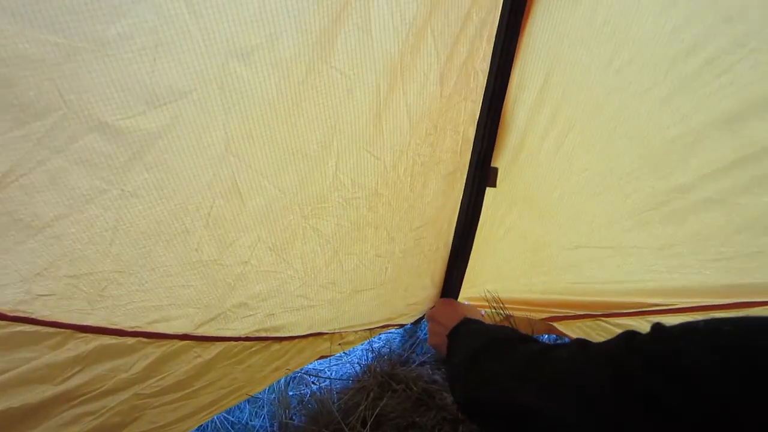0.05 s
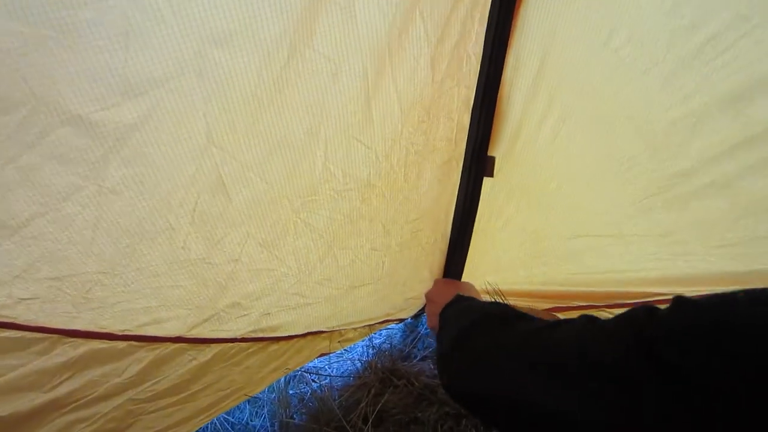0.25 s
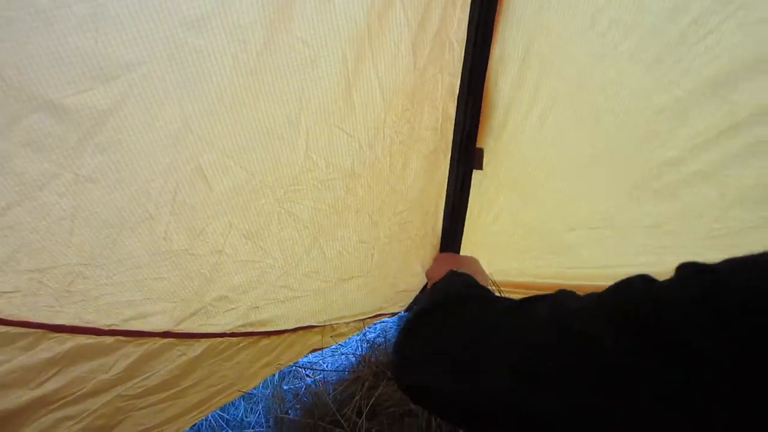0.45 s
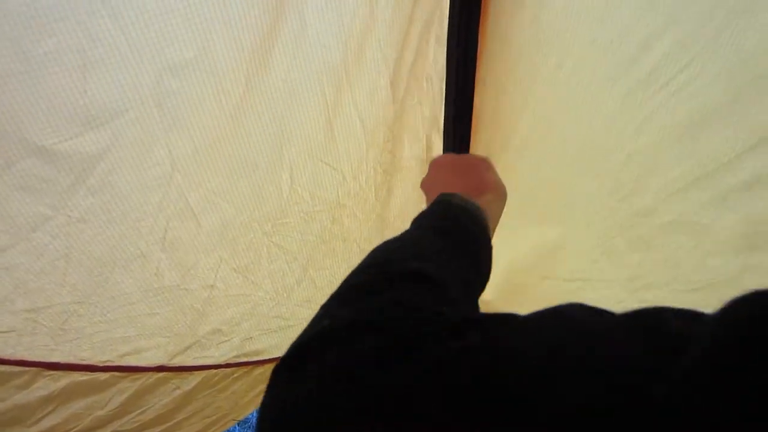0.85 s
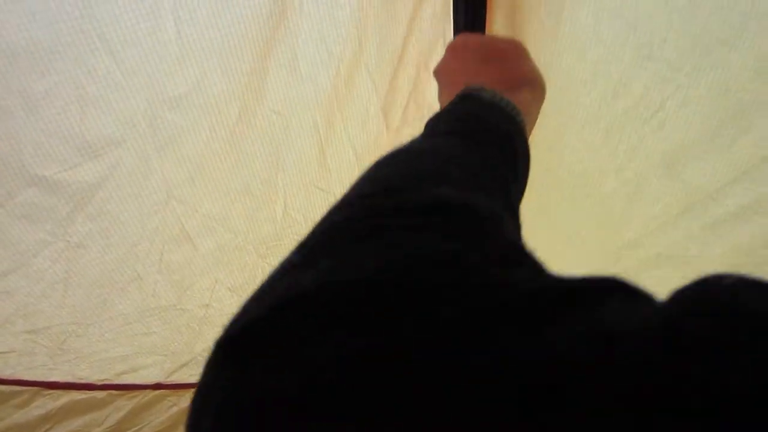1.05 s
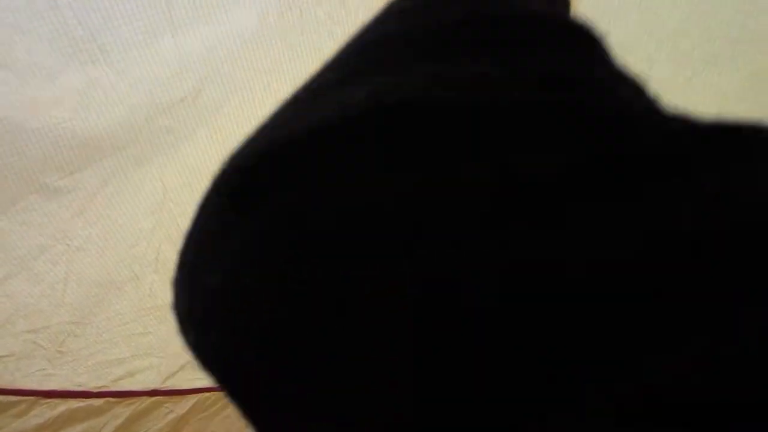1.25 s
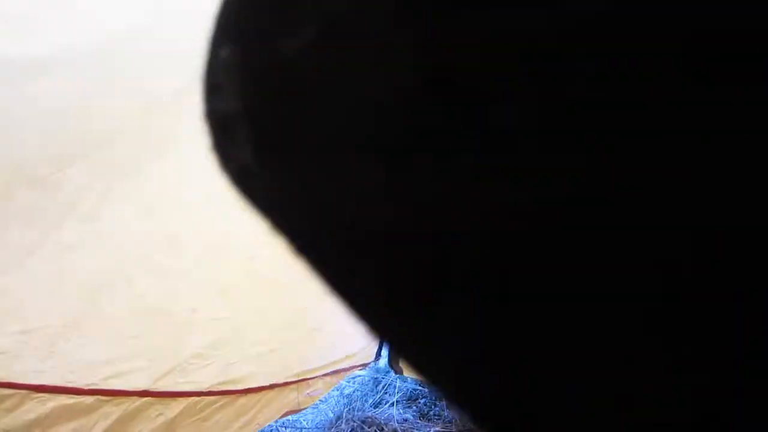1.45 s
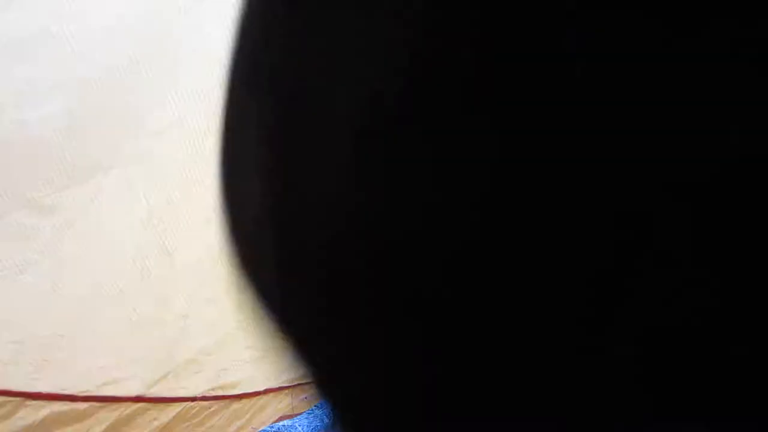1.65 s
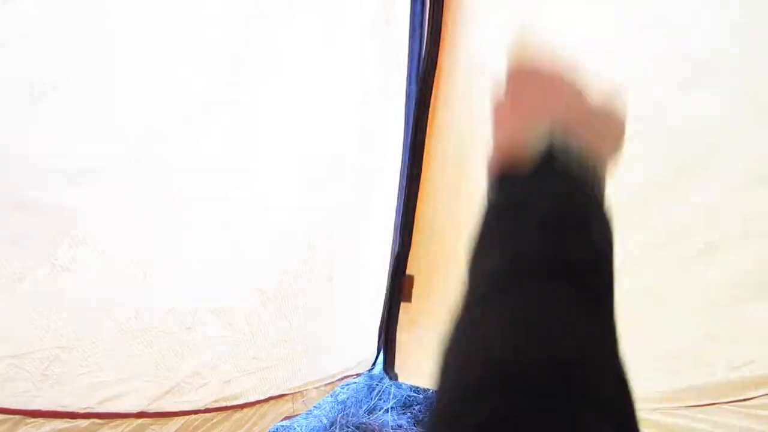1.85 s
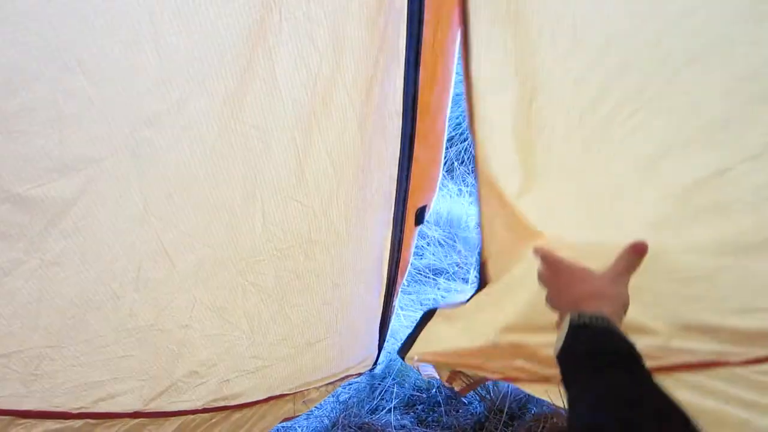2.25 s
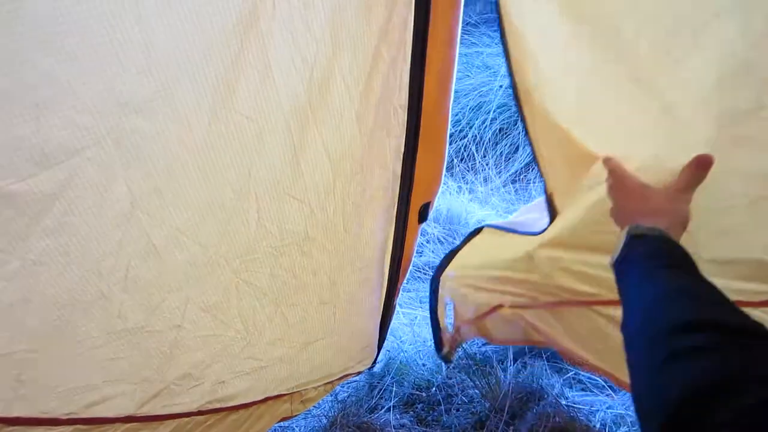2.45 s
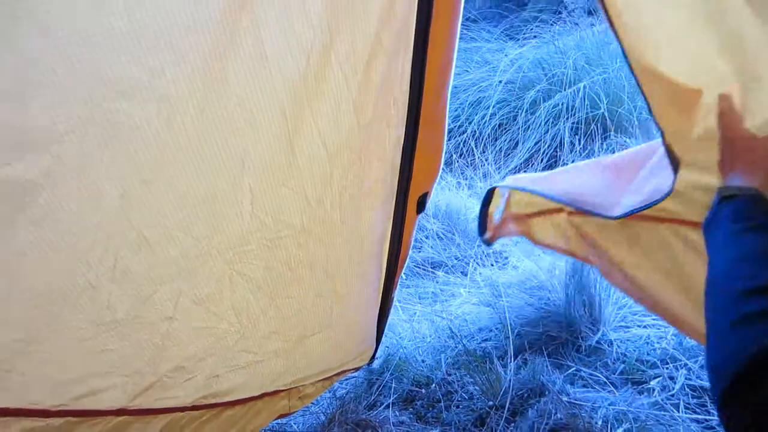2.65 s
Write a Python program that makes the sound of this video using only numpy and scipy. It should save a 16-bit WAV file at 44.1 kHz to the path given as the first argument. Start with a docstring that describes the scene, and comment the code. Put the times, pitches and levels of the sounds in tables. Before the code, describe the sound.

A tent zipper, heard from inside, starts ticking at about 0.2 seconds and merges into a buzz that rises in pitch and loudness, with light scraping and brief squeaks. It turns jerky around 1.3 seconds and stops at 1.6. From 1.8 seconds the nylon flap swishes aside and rustles, with soft pops and crease snaps near 2.0 and 2.4. A faint, steady outdoor rush lies underneath.

```python
"""A tent door zipper, heard from inside, pulled up in one stroke. Single tooth ticks merge into a
rising buzz that sags as the arm runs out of reach; the taut fabric hums along, the slider scrapes
and the tape squeaks. Near the top the zipper binds and stops. The nylon flap is then swept aside
with a swish, soft pops and crease snaps, over a steady outdoor rush."""
import sys
import numpy as np
from scipy import signal
from scipy.fft import rfft, irfft, next_fast_len
from scipy.io import wavfile
from scipy.ndimage import map_coordinates

SR = 44100
rng = np.random.default_rng(int(sys.argv[2]) if len(sys.argv) > 2 else 0)


def persist_wave(psi):
    """Save psi, clipped to +-1, as 16-bit WAV."""
    counts = np.round(np.clip(psi, -1, 1) * 32767).astype(np.int16)
    wavfile.write(sys.argv[1], SR, np.atleast_2d(counts).T)


N = 119070

# Tooth tick spectrum. Each row: frequency in Hz, relative level in dB.
TICK_SPECTRUM = [(40, -33.5), (130, -16.5), (450, 8.5), (1200, -0.5), (2300, -1), (2800, -9), (4600, -22.5),
                 (8000, -27.5), (12000, -51)]
# Nylon swish spectrum. Each row: frequency in Hz, relative level in dB.
SWISH_SPECTRUM = [(200, -11.5), (3000, -7), (7000, -5.5), (9000, -10.5), (12200, -31.5), (14000, -22)]


def amp(db):
    """Decibels to gain."""
    return 10 ** (np.asarray(db) / 20)


def unit(x):
    """Scale to rms 1."""
    return x / np.sqrt(np.mean(x ** 2) + 1e-20)


def along(points, hz):
    """Interpolate (Hz, value) points on a log axis."""
    f, v = np.transpose(points)
    return np.interp(np.log(hz + 1), np.log(f + 1), v)


def curves(rows):
    """One value per sample for each column after the time."""
    times_s, *columns = np.transpose(rows)
    return [np.interp(np.arange(N) / SR, times_s, c) for c in columns]


def wobble(knots_per_s):
    """Smooth random curve, rms about 1."""
    return map_coordinates(rng.standard_normal(N // 8), [np.arange(N) * knots_per_s / SR], mode="wrap")


def filtered(x, response):
    """Apply a response given as a function of Hz."""
    size = next_fast_len(N + SR // 2)
    return irfft(rfft(x, size) * response(np.fft.rfftfreq(size, 1 / SR)), size)[..., :N]


def causal(spectrum, size=4096):
    """Minimum-phase impulse response of unit energy."""
    cepstrum = irfft(np.log(amp(along(spectrum, np.fft.rfftfreq(size, 1 / SR)))))
    cepstrum[1:size // 2] *= 2
    cepstrum[size // 2 + 1:] = 0
    impulse = irfft(np.exp(rfft(cepstrum)))
    return impulse / np.linalg.norm(impulse)


def pulses(at, sizes, order=8):
    """Band-limited impulses at fractional sample positions."""
    taps = np.floor(at)[:, None] + np.arange(1 - order, order + 1)
    offset = taps - at[:, None]
    shape = sizes[:, None] * np.sinc(offset) * np.cos(np.pi * offset / (2 * order)) ** 2
    return np.bincount(np.clip(taps, 0, N - 1).astype(int).ravel(), shape.ravel(), N)


def rush(spectrum, grain_db=0, grains_per_s=900):
    """Stereo noise of rms 1, optionally clumped into grains."""
    # Each row: frequency in Hz, left-right correlation.
    correlation = [(30, 0.23), (150, 0.82), (4500, 0.85), (12000, 0.6)]

    def mid_side_gains(hz):
        angle = np.arccos(np.clip(along(correlation, hz), -1, 1)) / 2
        return amp(along(spectrum, hz)) * [np.cos(angle), np.sin(angle)]

    pair = rng.standard_normal((2, N)) * amp(grain_db * wobble(grains_per_s))
    mid, side = filtered(pair, mid_side_gains)
    return unit(np.array([mid + side, mid - side]))


def friction_tone(hz, scatter):
    """Fuzzy tone whose pitch varies by the fraction scatter."""
    return np.sin(2 * np.pi * np.cumsum(hz * (1 + scatter * wobble(900))) / SR)


def outdoors(level_db=-43.5):
    """Steady, slightly wavering rush from outside."""
    # Each row: frequency in Hz, relative level in dB.
    spectrum = [(25, -38), (60, -8.5), (130, 1), (550, -5), (1200, -6), (1800, -15), (8000, -35),
                (12000, -53)]
    return amp(level_db + wobble(11.5)) * rush(spectrum)


def cloth_pops(rise_s=.00086, t60_cycles=8.8, puff_decay_s=.012, puff_db=-2, crease_t60_s=.022):
    """Slack cloth jerks taut with a damped thump and a puff; creases snap."""
    # Each row: start in seconds, relative level in dB, pitch in Hz.
    pops = [(.074, -31.5, 141), (.252, -28, 674), (.338, -31.5, 152), (1.631, -26, 294),
            (1.647, -32, 256.5), (1.664, -31, 223.8), (1.682, -31, 200), (1.963, -33.5, 177),
            (1.996, -18.5, 800), (2.008, -28, 650), (2.283, -29.5, 194), (2.299, -28, 353),
            (2.404, -19, 243), (2.434, -20.5, 497)]
    # Each row: frequency in Hz, relative level in dB.
    puff_spectrum = [(40, -11), (150, 0.5), (900, -5.5), (1500, -19), (2600, -20.5), (12000, -73)]
    # Each row: start in seconds, relative level in dB.
    creases = [(0.255, -36.5), (1.632, -50), (2.3, -38), (2.406, -32), (2.44, -32), (2.588, -33),
               (2.601, -37)]
    t = np.arange(N) / SR
    thumps, puffs, snaps = np.zeros((3, N))
    for start_s, db, hz in pops:
        age_s = np.clip(t - start_s, 0, 1)
        envelope = 1.27 * amp(db - 60 * age_s * hz / t60_cycles) * (1 - np.exp(-age_s / rise_s))
        thumps += envelope * np.sin(2 * np.pi * hz * age_s)
        puffs += envelope * np.exp(-age_s / puff_decay_s)
    for start_s, db in creases:
        snaps += (t > start_s) * amp(db - 60 * np.abs(t - start_s) / crease_t60_s)
    return thumps + amp(puff_db) * puffs * rush(puff_spectrum) + .5 * snaps * rush(SWISH_SPECTRUM)


def weave(start_s, rib_hz=2080, sag_per_s=1.05, wander_db=3):
    """Nylon ribs rasp past each other: harmonics 2-4 of the rib rate sink as the sweep slows."""
    slowing = np.exp(-sag_per_s * np.maximum(np.arange(N) / SR - start_s, 0))
    return unit(sum(amp(wander_db * wobble(20)) / k * friction_tone(k * rib_hz * slowing, scatter=.05)
                    for k in range(2, 5)))


def sliding_nylon(weave_db=-1):
    """Sleeve, then flap on wall: grainy swish, dull rustle of folds; fast sweeps add hiss and rasp."""
    # Each row: time in seconds, swish level in dB, rustle level in dB.
    levels = [(0, -58, -50), (.3, -61.5, -48.5), (1.805, -90, -75), (1.815, -42, -42), (1.865, -39, -39.5),
              (1.952, -44.5, -43.5), (2.005, -45.5, -38), (2.11, -48.5, -45.5), (2.3, -51.5, -44),
              (2.34, -55, -49.5), (2.46, -47.5, -43), (2.54, -52, -45), (2.59, -46.5, -37.5),
              (2.63, -49.5, -43.5), (2.7, -44.5, -46)]
    # Each row: centre in seconds, half-width in seconds, level in dB.
    sweeps = [(1.86, 0.028, -42.5), (2.015, 0.063, -46.5)]
    # Each row of both spectra: frequency in Hz, relative level in dB.
    hiss_spectrum = [(3000, -30), (7000, 5), (9000, 6), (12200, -11), (14000, -3)]
    rustle_spectrum = [(60, -17), (150, -49), (400, 3.5), (1300, 7), (3500, -3.5), (12000, -37)]
    t = np.arange(N) / SR
    swish_db, rustle_db = curves(levels)
    swish = amp(swish_db + wobble(68)) * rush(SWISH_SPECTRUM, grain_db=2, grains_per_s=1200)
    surge = sum(amp(db) * np.exp(-((t - centre_s) / half_s) ** 2) for centre_s, half_s, db in sweeps)
    sheen = surge * (rush(hiss_spectrum) + amp(weave_db) * weave(start_s=levels[2][0]))
    rustle = amp(rustle_db + 1.64 * wobble(80)) * rush(rustle_spectrum, grain_db=1.5, grains_per_s=350)
    return swish + sheen + rustle


def tape_squeaks():
    """Brief, narrow bands of friction between slider and tape."""
    # Each row: centre in seconds, half-width in seconds, pitch in Hz, fractional scatter, level in dB.
    squeaks = [(0.493, 0.07, 3110, 0.1, -41), (0.996, .09, 4640, 0.016, -44), (1.483, 0.04, 3192, .07, -40)]
    t = np.arange(N) / SR
    return sum(amp(db) * np.exp(-((t - centre_s) / half_s) ** 2) * friction_tone(hz, scatter)
               for centre_s, half_s, hz, scatter, db in squeaks)


def slider_scrape(teeth_passed, scrape_db):
    """Friction noise of the slider, pulsing once per tooth."""
    # Each row: frequency in Hz, relative level in dB.
    spectrum = [(100, 7), (200, 13), (400, -4.5), (1200, 13.5), (2400, 2.5), (5000, -0.5), (7500, -6.5),
                (11000, -19.5), (12200, -58), (14000, -22)]
    pulsing = 1 + .6 * np.cos(2 * np.pi * teeth_passed)
    return amp(scrape_db + 5.5 + 1.1 * wobble(60.1)) * pulsing * rush(spectrum)


def fabric_hum(teeth_passed, tooth_hz, tick, upper_gain, smear_rad, flutter_db=3, odd_loss_db=2):
    """Taut cloth hums with the teeth: harmonics 1-3 strong, 4-8 weaker and wandering."""
    # Each row: time in seconds, levels of harmonics 1, 2 and 3 in dB.
    levels = [(.3, -38, -71, -69), (.37, -34, -37.5, -41), (.56, -36.5, -39.5, -65), (.585, -48, -32, -40),
              (.63, -55, -31.5, -30), (.68, -48, -48, -48), (.77, -41, -31.5, -87), (.91, -56, -24.5, -37),
              (1.13, -32.5, -23, -33), (1.27, -40, -24, -29), (1.31, -24.5, -28, -28),
              (1.375, -38, -22, -31), (1.405, -70, -44, -35.5), (1.43, -58, -20.5, -31),
              (1.455, -41, -60, -44), (1.505, -70, -39.5, -23.5), (1.6, -60, -44, -43.5)]
    hz = np.fft.rfftfreq(len(tick), 1 / SR)
    tick_rad = np.unwrap(np.angle(rfft(tick)))

    def harmonic(k, drift_rad):
        return np.cos(k * (2 * np.pi * teeth_passed + drift_rad) + np.interp(k * tooth_hz, hz, tick_rad))

    hum = np.zeros(N)
    for k, db in enumerate(curves(levels), 1):
        hum += amp(db + flutter_db * wobble(70.07)) * harmonic(k, smear_rad * wobble(330))
    for k in range(4, 9):
        db = along(TICK_SPECTRUM, k * tooth_hz) - 4 - odd_loss_db * (k % 2)
        hum += upper_gain * amp(db + flutter_db * wobble(22.5)) * harmonic(k, .28 * wobble(130))
    return hum


def tooth_impacts(teeth_passed, binding, free_jitter_s=.00004, binding_jitter_s=.00022, scatter_db=2.5):
    """One impulse per tooth entering the slider, less regular where it binds."""
    teeth = np.arange(1, int(teeth_passed[-1]) + 1)
    timing, size = rng.standard_normal((SR, 2))[teeth].T
    at = np.interp(teeth, teeth_passed, np.arange(N))
    jitter_s = np.where(binding[at.astype(int)], binding_jitter_s, free_jitter_s)
    return pulses(at + jitter_s * SR * timing, amp(scatter_db * size))


def zipper(binds_from_s=1.33, slow_hz=300, thud_db=3.5, delay_at_1khz_s=.00082):
    """Teeth tick through the slider and merge into a buzz; the pull turns jerky where it binds."""
    # Each row: time in seconds, slider speed in teeth per second.
    speed = [(.19, 49.2), (.215, 86), (.26, 143), (.4, 231), (.462, 273), (.482, 313), (.563, 338),
             (.578, 358), (.62, 428), (.68, 500), (.72, 474), (.8, 513), (.91, 599), (1.005, 584),
             (1.16, 602), (1.262, 578), (1.325, 491), (1.35, 482), (1.365, 438), (1.428, 339), (1.513, 497),
             (1.55, 400), (1.6, 213)]
    # Each row: time in seconds, relative tick level in dB, relative scrape level in dB.
    pull = [(.18, -51.5, -64), (.208, -41, -57), (.3, -40, -59.5), (.4, -36.5, -56.5), (.5, -42.5, -49),
            (.562, -39.5, -51.5), (.585, -34.5, -48), (.8, -31, -46.5), (.92, -31, -41), (1.08, -29, -41.5),
            (1.16, -37.5, -37.5), (1.32, -31, -42), (1.43, -29.5, -47), (1.462, -32, -48),
            (1.49, -32.5, -43), (1.588, -31.5, -53.5), (1.605, -71, -59)]
    t = np.arange(N) / SR
    moving = (t > pull[0][0]) & (t < pull[-1][0])
    binding = t > binds_from_s
    tooth_hz = curves(speed)[0] * (1 + np.where(binding, .06, .032) * wobble(115))
    teeth_passed = np.cumsum(tooth_hz * moving) / SR + .5
    tick_db, scrape_db = curves(pull)
    impacts = tooth_impacts(teeth_passed, binding) * np.sqrt(SR / tooth_hz) * amp(tick_db)
    # Slow teeth tug the cloth with a duller thud.
    slow = 1 / (1 + (tooth_hz / slow_hz) ** 4)
    tick = causal(TICK_SPECTRUM)
    thud = causal([(30, -14), (140, 5), (694, -3), (1600, -24), (8000, -52)])
    ticks = signal.fftconvolve(impacts * (1 - slow), tick)[:N]
    thuds = amp(thud_db) * signal.fftconvolve(impacts * slow, thud)[:N]
    hum = fabric_hum(teeth_passed, tooth_hz, tick, upper_gain=amp(tick_db) * (1 - slow) * ~binding,
                     smear_rad=np.where(binding, .25, .13))
    # The cloth carries low notes later than high ones.
    dispersion = lambda hz: -np.exp(-4j * np.pi * delay_at_1khz_s * np.sqrt(1000 * hz))
    buzz = filtered(ticks + thuds + moving * hum, dispersion)
    return buzz + moving * slider_scrape(teeth_passed, scrape_db) + tape_squeaks()


def scene():
    """All sources, a little to the left."""
    # Each row: frequency in Hz, left over right in dB.
    balance = [(250, 4.5), (1200, 4), (2500, 3), (12000, 2)]
    mix = zipper() + sliding_nylon() + cloth_pops() + outdoors()
    return filtered(mix, lambda hz: amp(np.outer([.5, -.5], along(balance, hz))))


def record(dry):
    """Thin the deepest bass and cut the top treble."""
    low_cut_hz, top_hz = 55, 15800
    return filtered(dry, lambda hz: (hz < top_hz) * hz / np.hypot(hz, low_cut_hz))


dry = scene()
out = record(dry)
persist_wave(out)
```